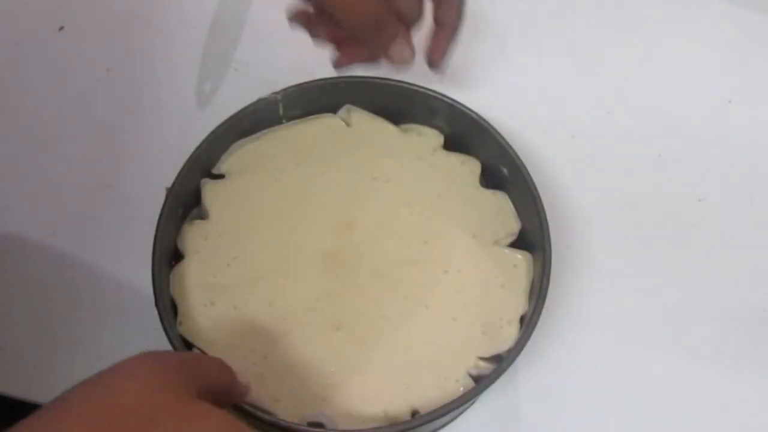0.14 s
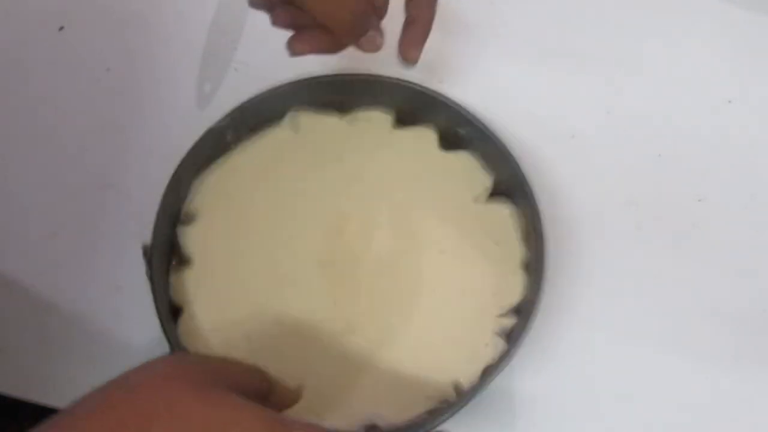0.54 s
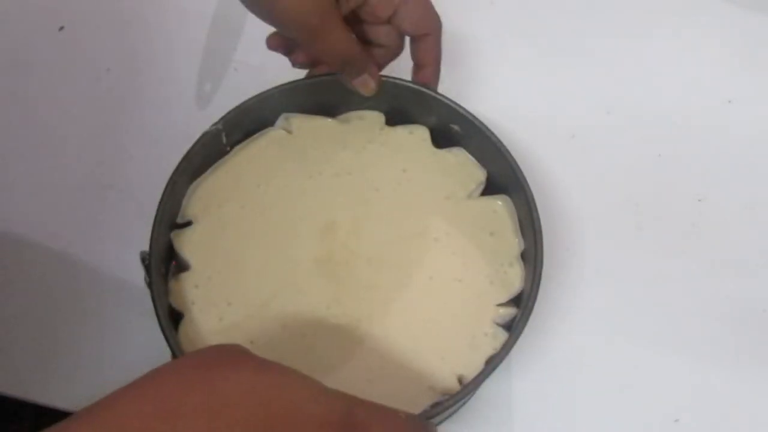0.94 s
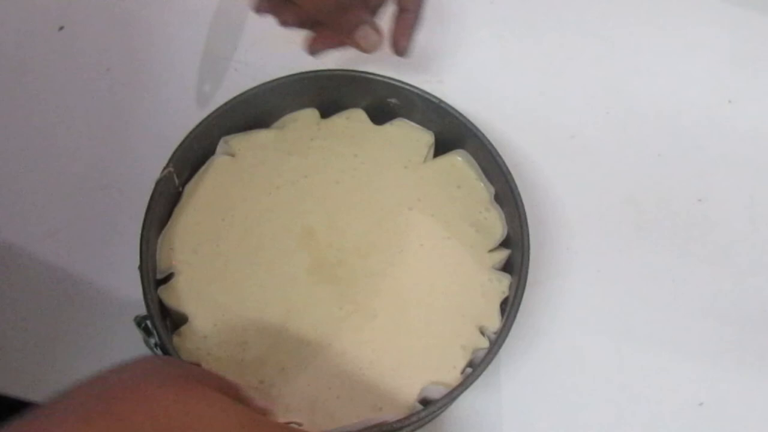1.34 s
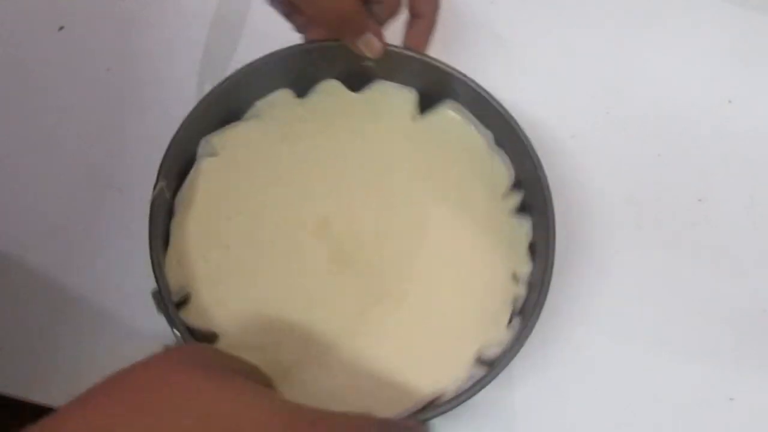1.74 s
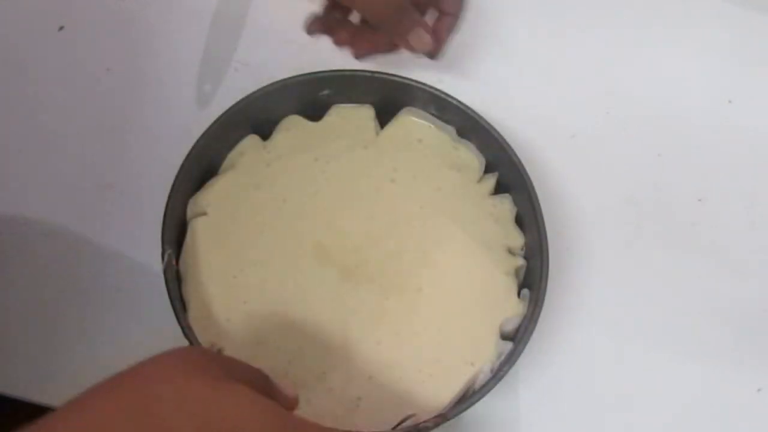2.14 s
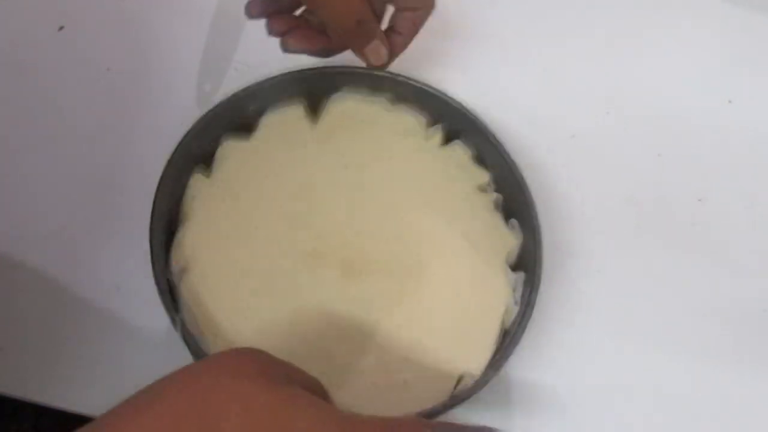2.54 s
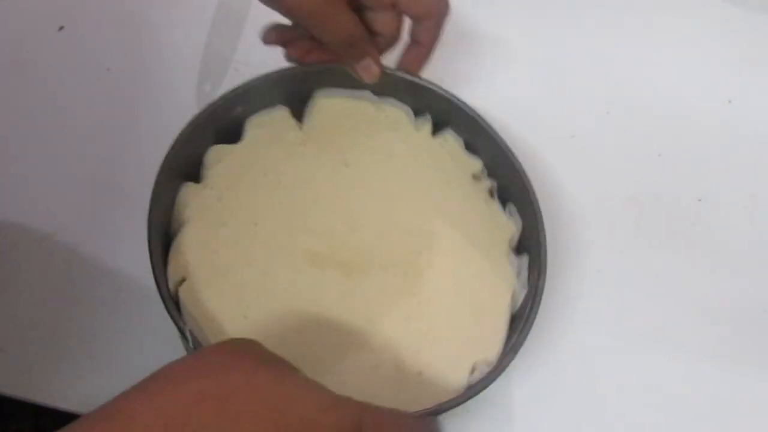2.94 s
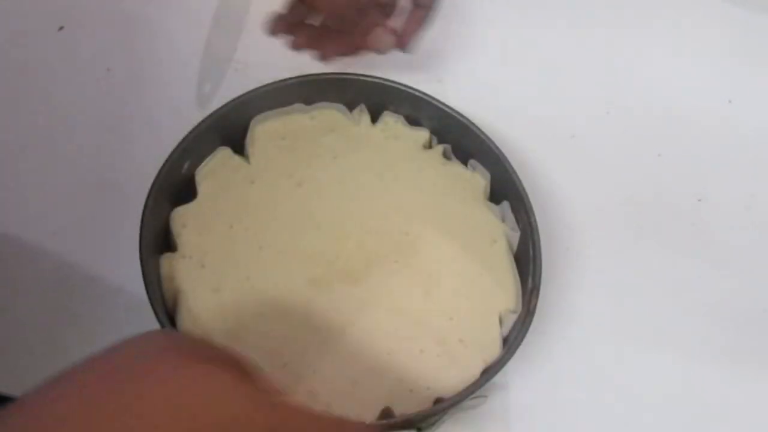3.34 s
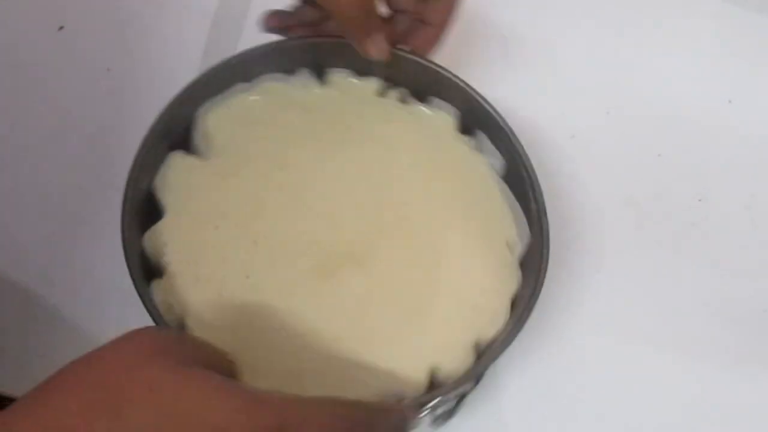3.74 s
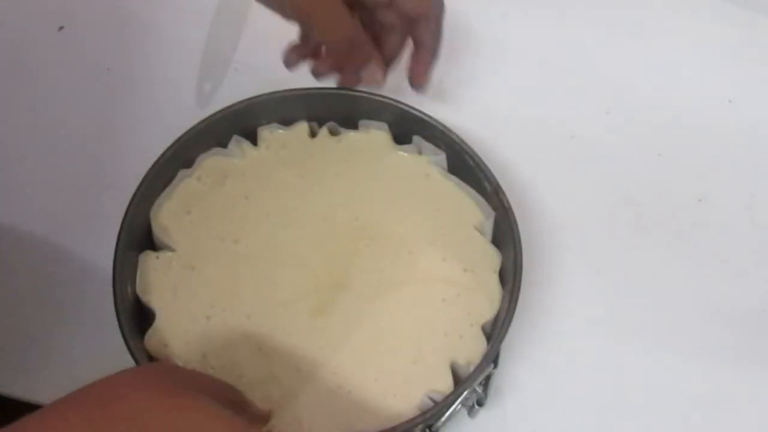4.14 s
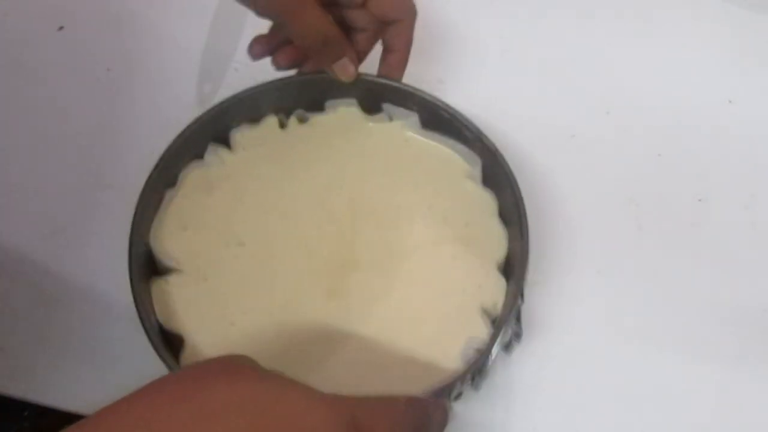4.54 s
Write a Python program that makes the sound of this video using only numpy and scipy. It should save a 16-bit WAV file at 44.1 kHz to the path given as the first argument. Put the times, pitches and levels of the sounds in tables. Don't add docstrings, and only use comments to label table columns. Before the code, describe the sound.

The tail of one bang opens the sound, then seven more evenly paced knocks of a filled tin on a countertop, many of them quick double hits as one edge lands before the other. Damped metal clack, woody low boom and lively kitchen reverberation follow each. Very quiet skin rubs on the rim between. Close, slightly limited small microphone with low background noise.

```python
import sys
import numpy as np
from scipy import signal
from scipy.fft import rfft, irfft
from scipy.io import wavfile
from scipy.ndimage import uniform_filter1d

SR = 44100
rng = np.random.default_rng(int(sys.argv[2]) if len(sys.argv) > 2 else 0)


def wrap_up_sound(samples):
    columns = np.atleast_2d(samples).T
    tamed = np.clip(columns, -1, 1)
    steps = np.round(tamed * 32767).astype(np.int16)
    wavfile.write(sys.argv[1], SR, steps)


def invert_db(x):
    u = np.asarray(x, float) / 20
    return 10 ** u


N = 206211

# time of the deepest swing in seconds,
# thud peak in dB, thud pitch in Hz, metal crack peak in dB, brightness in dB.
LANDINGS = [(-.04, 17, 1300, -20, 4.5), (-.02, -5.5, 1300, -14, 2), (0.6219, -3.5, 1830, -5.5, 4),
            (0.6262, -2.5, 1630, -11, 2), (1.2535, -1, 1262, -18.5, -8), (1.268, -18, 1248, -17, 3.5),
            (1.9121, -3.5, 1300, -7.5, -6.5), (1.932, -11.5, 1300, -9.5, 6), (2.5964, -11, 1338, -14.5, -5),
            (2.6256, -0.5, 950, -8, -1), (3.2027, -7, 1257, -13.5, -2), (3.2156, -4, 1127, -6, 1.5),
            (3.9129, -11.5, 1236, -19, -5), (3.96, -4.5, 1106, -3, 5), (4.616, -14, 1443, -19.5, -1),
            (4.6199, -32.5, 1260, -24, 9)]
# pitch in Hz, level in dB, seconds to fall 60 dB.
TIN_MODES = [(700, -20, .05), (747, -19, .06), (840, -17, .06), (1030, -16, .05), (1147, -14, .05),
             (1252, -8, .045), (1420, -14, .05), (1570, -17, .04), (1750, -17, .04), (1960, -20, .03),
             (2160, -21, .03)]
# pitch in Hz, level in dB, seconds to fall 60 dB.
SLAB_MODES = [(184, -26, 0.11), (286, -16.5, 0.058), (330.6, -14.5, 0.014), (390.4, -20.5, 0.11),
              (478.5, -11.5, 0.012), (673, -15, 0.022)]
# centre in Hz, width in Hz, level in dB.
CRACK_BANDS = [(2486, 2700, -2), (4410, 850, -6.5), (6260, 640, -7.5), (10500, 2600, -10)]
# frequency in Hz, seconds to fall 60 dB.
KITCHEN_T60 = [(80, 0.94), (210, 1.13), (560, 0.54), (1470, 0.65), (3880, 0.59), (10200, 0.39)]
# frequency in Hz, level in dB.
DROP_ECHO_COLOUR = [(60, -21), (130, -26), (300, -3), (480, -1.5), (750, 3.5), (1250, 1), (1800, -2.5),
                    (2400, -8.5), (3500, -13.5), (6300, -19), (11000, -20), (15500, -23.5)]
# pitch in Hz, level in dB, seconds to fall 60 dB.
CABINET_MODES = [(170, -18, .3), (217, -13, .3), (257, -6, .4), (284, -7, .28), (303, -4, .25),
                 (335, -10, .25), (412, -18, .2)]
# start in seconds, beating pair in dB, upper note in dB.
DEEP_NOTES = [
    (-.03, -37, -57),
    (0.623, -49.5, -40.5),
    (1.253, -36.5, -40.5),
    (1.91, -44.5, -36),
    (2.626, -58, -48),
    (3.214, -49, -49.5),
    (3.961, -59, -51.5),
]
# pitch in Hz, level in dB, seconds to fall 60 dB.
BEATING_PAIR = [(107.8, 0, 1.3), (109.5, -2.5, 1.7)]
# start in seconds, pitch in Hz, level in dB, seconds to fall 60 dB.
METALWARE = [
    (3.216, 3478, -51, 1.15),
    (3.216, 3047, -54, 1.15),
    (3.216, 4355, -62, 1.1),
    (.627, 4050, -60, 1.5),
]
# start in seconds, length in seconds, level in dB, centre in Hz,
# upper band in dB.
FINGER_BRUSHES = [(0.311, 0.042, -63, 6500, 2), (0.56, 0.054, -56, 5405, 1.5),
                  (0.897, 0.069, -60, 5880, -2.5), (1.194, 0.058, -56.5, 4920, -1.5),
                  (1.516, 0.15, -81.5, 6500, 1.5), (1.793, 0.24, -64.5, 5330, -1),
                  (2.269, 0.11, -69, 6490, 4.5), (2.547, 0.11, -57.5, 5930, -9),
                  (2.853, 0.098, -69, 6000, 2), (3.136, 0.061, -62.5, 6070, -11.5),
                  (3.561, 0.12, -61, 5600, 1.5), (3.824, 0.089, -68, 5460, -3),
                  (4.287, 0.06, -66.5, 6500, -2), (4.567, 0.061, -72, 6620, -5)]
# start in seconds, peak in dB, pitch in Hz.
FINGER_TICKS = [(.034, -26, 6600), (.327, -42, 6550), (0.652, -32.5, 6000), (0.682, -23, 6500),
                (0.929, -51, 6770), (1.037, -52.5, 6700), (1.2805, -34.5, 6230), (1.296, -21, 4200),
                (1.3161, -27, 6600), (1.953, -24.5, 4540), (2.296, -45, 4900), (2.336, -47, 6500),
                (2.857, -39.5, 5000), (3.574, -45.5, 6000), (3.599, -54.5, 4500), (4.269, -49.5, 6500),
                (4.315, -57, 6440), (1.601, -58.5, 6000), (1.52, -55.5, 9500), (1.561, -57.5, 5500),
                (1.645, -56.5, 6800)]
# start in seconds, level in dB.
SLAB_BUMPS = [(-.005, -18), (0.371, -40), (.648, -17), (1.022, -40), (1.285, -21), (1.661, -58.5),
              (1.935, -25), (2.3, -60), (2.597, -25), (2.635, -25.5), (2.868, -60), (3.22, -28.5),
              (3.915, -25.5), (3.976, -25), (4.349, -66.5)]
# frequency in Hz, level in dB.
FINGER_ECHO_COLOUR = [(300, -5), (2000, 0.5), (15000, -4.5)]
# frequency in Hz, level in dB per Hz.
HISS_COLOUR = [(25, -6.5), (60, 1.5), (85, -11.5), (130, -4.5), (300, -5), (500, 2), (1400, -10),
               (2500, -16.5), (4000, -18), (6500, -22.5), (8000, -29.5), (11000, -26.5), (15000, -45.5),
               (16000, -63.5)]
# centre in Hz, width in Hz, level in dB.
HUM_BANDS = [(121, 33, -5.5), (165, 6.5, -13), (302.4, 75, -12), (320.3, 38, -9), (6500, 170, -28.5)]
# time in seconds, level in dB.
BACKGROUND_LEVEL = [(0, -46.5), (.6, -57), (1.2, -56), (1.85, -58.5), (2.55, -60), (3.15, -63), (3.85, -65),
                    (4.68, -69)]
# frequency in Hz, gain in dB.
MIC_COLOUR = [(30, -16.5), (85, -6), (105, -1), (5000, 1), (6500, 2.5), (7200, -5.5), (8000, -12.5),
              (8600, -9), (10500, -4.5), (12500, -10.5), (14600, -16), (15300, -39), (16000, -51.5)]

LEAD = 4410
RISE = .0015


def evened(x):
    return x / np.sqrt(np.mean(x ** 2) + 1e-20)


def read(points, hz):
    f, value = np.transpose(points)
    return np.interp(np.log(hz + 1), np.log(f + 1), value)


def add(mix, s, sound):
    part = mix[round(s * SR) + LEAD:][:len(sound)]
    part += sound[:len(part)]


def band(x, hz, width):
    return signal.lfilter(*signal.iirpeak(np.clip(hz, 50, 20000), hz / width, SR), x)


def modes(table, t, spread_db):
    total = 0
    for hz, db, t60 in table:
        strength, phase = rng.standard_normal(2)
        level = invert_db(db + spread_db * strength - 60 * t / t60)
        total = total + level * np.sin(2 * np.pi * hz * t + 0.88 * phase)
    return total


def swing(hz, t, peak_s, width):
    bell = np.exp(-.5 * ((t - peak_s) * hz / width) ** 2)
    return bell, t - RISE


def contact(db, hz, crack_db, ring_db):
    t = np.arange(SR // 10) / SR
    bell, after = swing(hz, t, 1.07 * RISE, .7)
    thud = -.86 * np.cos(2 * np.pi * hz * after) * bell
    bell, after = swing(hz, t, .9 * RISE, .5)
    thud -= .3 * np.cos(2 * np.pi * 1.75 * hz * after) * bell

    ring = modes(TIN_MODES, t, 2.5) * (1 - np.exp(-(t / .0022) ** 3))
    ring = ring + modes(SLAB_MODES, t, 1.4) * (1 - np.exp(-t / 0.0013))

    burst = (t / .0012 * np.exp(1 - t / .0012)) ** 2
    scrape = 1.3 * (1 - np.exp(-t / 0.0016)) * np.exp(-t / 0.0035)
    grit = rng.standard_normal(len(t)) * (burst + scrape)
    crack = sum(invert_db(d) * band(grit, f, w) for f, w, d in CRACK_BANDS)
    return invert_db(db) * thud + invert_db(ring_db) * ring + invert_db(crack_db) * crack / abs(crack).max()


def kitchen(colour, treble_db):
    n = SR * 3 // 2
    taps = rng.choice([-1., 1.], n) * (rng.random(n) < .12)
    hz, t, z = signal.stft(taps, SR, nperseg=512)
    t60 = read(KITCHEN_T60, hz)[:, None]
    early = invert_db(12.0 - 60 * t / 0.048)
    late = invert_db(-17.0 - 60 * t / (1.97 * t60))
    decay = invert_db(-60 * t / t60) + late + early
    shade_db = read(colour, hz) + treble_db / (1 + (2600 / (hz + 1)) ** 4)
    tail = signal.istft(z * decay * invert_db(shade_db[:, None]), SR, nperseg=512)[1]
    tail = tail * (1 - np.exp(-(np.arange(len(tail)) / SR / .009) ** 2))
    return tail / np.linalg.norm(tail)


def boom(t):
    feed = rng.standard_normal(len(t)) * (np.exp(-t / .04) + .25 * np.exp(-t / .15))
    return signal.fftconvolve(feed / np.linalg.norm(feed), modes(CABINET_MODES, t, 0.92))


def deep_note(db, upper_db, t):
    pair = sum(invert_db(d - 60 * t / t60) * np.sin(2 * np.pi * f * t) for f, d, t60 in BEATING_PAIR)
    upper = invert_db(upper_db - 60 * t / 1) * np.sin(2 * np.pi * 170.6 * t)
    return (invert_db(db) * pair + upper) * (1 - np.exp(-(t / .04) ** 2))


def drops():
    out, t = np.zeros(N + LEAD), np.arange(SR) / SR
    for s, db, hz, crack_db, bright_db in LANDINGS:
        touch = s - RISE
        ring_db = -5.5 + 0.4 * db - 0.13 * bright_db
        add(out, touch, contact(db, hz, crack_db, ring_db))

        weak_loss_db = 1.2 * max(-25 - db, 0)
        echo = kitchen(DROP_ECHO_COLOUR, bright_db)
        echo = echo + 0.49 * sum(band(echo, f, 54) for f, _, _ in TIN_MODES)
        echo_db = 8 + .3 * db - weak_loss_db
        add(out, touch, invert_db(echo_db) * echo)

        flat_loss_db = 0.092 * max(1240 - hz, 0)
        wander_loss_db = 0.53 * s
        add(out, touch, invert_db(-26 - flat_loss_db - wander_loss_db - weak_loss_db) * boom(t))
    for s, db, upper_db in DEEP_NOTES:
        add(out, s, deep_note(db, upper_db, t))
    for s, hz, db, t60 in METALWARE:
        wobble = 1 + .5 * np.cos(2 * np.pi * 5.3 * t)
        add(out, s, modes([(hz, db, t60)], t, 0) * wobble)
    return out


def brush(length, hz, upper_db):
    n, spare = int(length * SR), SR // 4
    slips = invert_db(4.0 * np.minimum(rng.exponential(1, spare), 4)) * (rng.random(spare) < .04)
    rub = evened(slips) * rng.standard_normal(spare) + rng.standard_normal(spare)
    pressure_db = 3.3 * evened(uniform_filter1d(rng.standard_normal(spare), 260))
    rub = (rub * invert_db(pressure_db))[:n]
    lower = evened(band(band(rub, hz, 1700), hz, 1700))
    upper = evened(band(band(rub, 10600, 1500), 10600, 1500))
    core = lower + invert_db(upper_db + 1) * upper
    rub = 0.46 * core + 1.3 * evened(band(rub, 8000, 9000))
    return rub * np.hanning(n) ** 0.75


def tick(hz, t):
    grit = rng.standard_normal(len(t)) * np.exp(-t / 0.0024)
    metal = sum(invert_db(d) * band(grit, f, w) for f, w, d in CRACK_BANDS)
    sound = band(grit, hz, 1200) + 1.3 * band(grit, 10600, 1800) + .5 * metal
    return sound / abs(sound).max()


def bump(t):
    swell = t / 0.0093 * np.exp(1 - t / 0.0093)
    return np.sin(2 * np.pi * 298.4 * t) * swell


def fingers():
    out, t = np.zeros(N + LEAD), np.arange(SR // 10) / SR
    for s, length, db, hz, upper_db in FINGER_BRUSHES:
        add(out, s, invert_db(db) * brush(length, hz, upper_db))
    for s, db, hz in FINGER_TICKS:
        add(out, s, invert_db(db) * tick(hz, t))
    for s, db in SLAB_BUMPS:
        add(out, s, invert_db(db) * bump(t))
    echo = signal.fftconvolve(out, kitchen(FINGER_ECHO_COLOUR, 0))[:len(out)]
    return out + invert_db(-9.0) * echo


def air():
    t, hz = np.arange(N) / SR, np.fft.rfftfreq(N, 1 / SR)
    colour_db = read(HISS_COLOUR, hz) - read(MIC_COLOUR, hz)
    hiss = evened(irfft(rfft(rng.standard_normal(N)) * invert_db(colour_db), N))
    hum = sum(invert_db(db) * evened(band(rng.standard_normal(N), f, w)) for f, w, db in HUM_BANDS)
    whine_hz = 11795
    whine = invert_db(-91 - read(MIC_COLOUR, whine_hz)) * np.sin(2 * np.pi * whine_hz * t)
    level_db = np.interp(t, *np.transpose(BACKGROUND_LEVEL))
    return invert_db(level_db) * (hiss + hum) + whine


def scene():
    return ((drops() + fingers())[LEAD:] + air())[None]


def band_limit(x):
    return signal.sosfilt(signal.butter(12, 15780, fs=SR, output="sos"), x)


def record(dry):
    log_gain = np.log(invert_db(read(MIC_COLOUR, abs(np.fft.fftfreq(4096, 1 / SR)))))
    taps = np.fft.ifft(np.exp(np.conj(signal.hilbert(log_gain)))).real[:2048]
    x = signal.oaconvolve(dry, taps[None])[:, :N]
    x = x / (1 + abs(x / .97) ** 6) ** (1 / 6)
    coupling_capacitor = signal.butter(1, 30, "high", fs=SR, output="sos")
    return band_limit(signal.sosfilt(coupling_capacitor, x))


dry = scene()
out = record(dry)
wrap_up_sound(out)
```